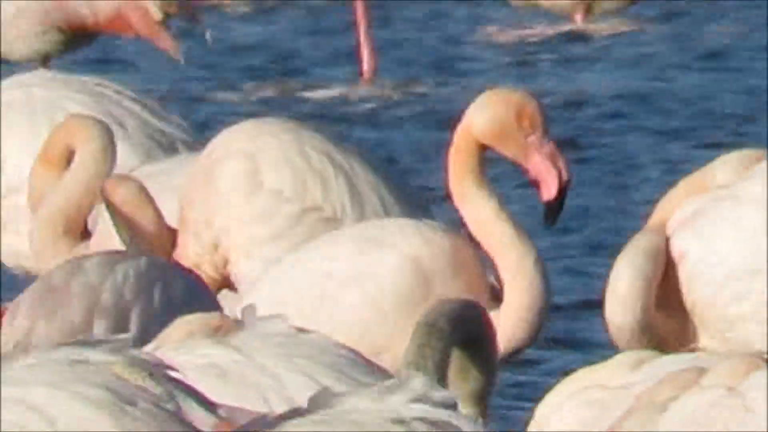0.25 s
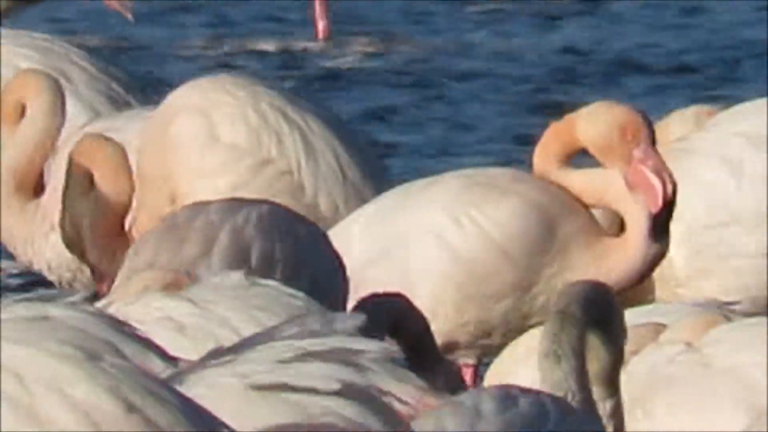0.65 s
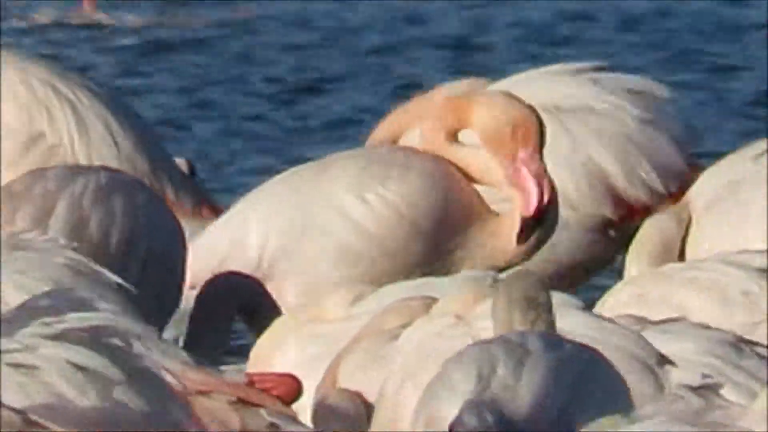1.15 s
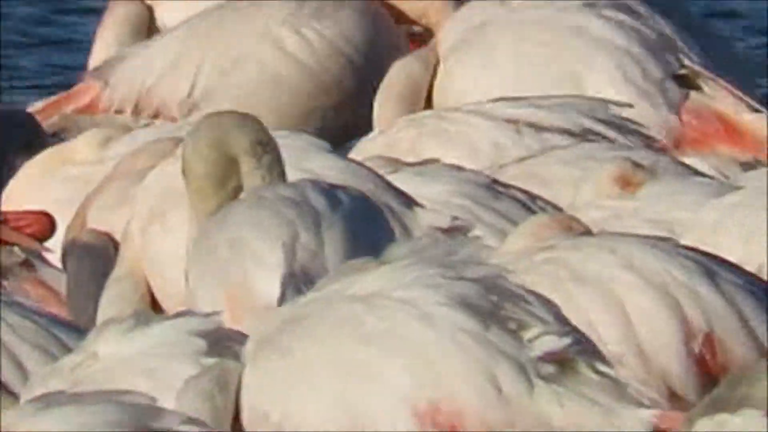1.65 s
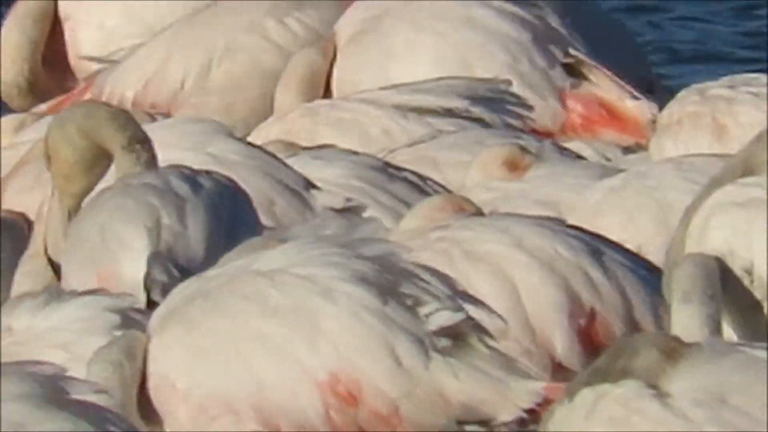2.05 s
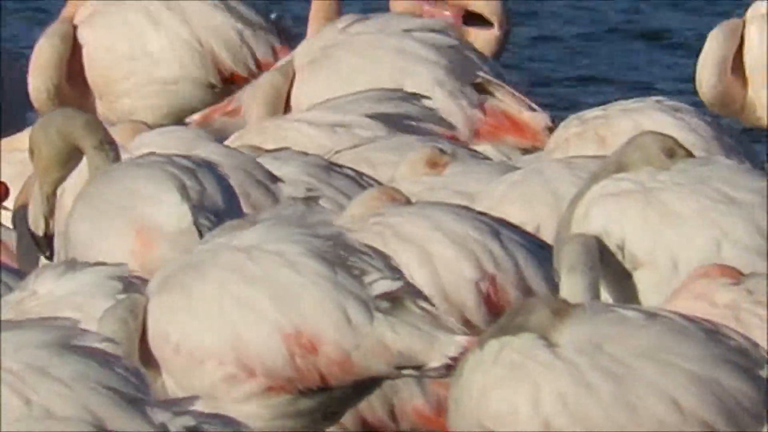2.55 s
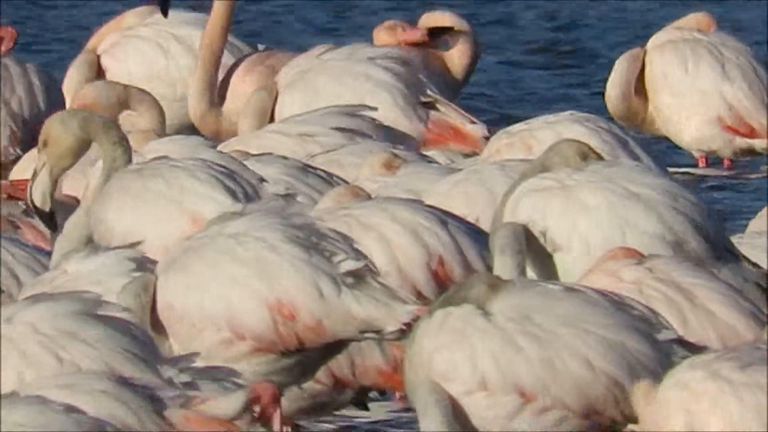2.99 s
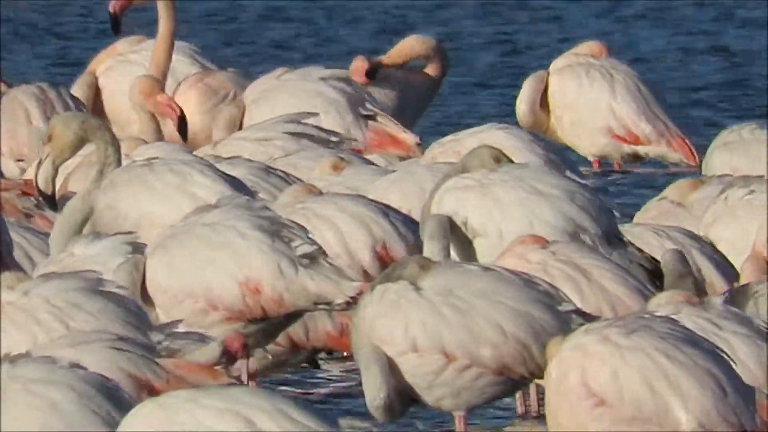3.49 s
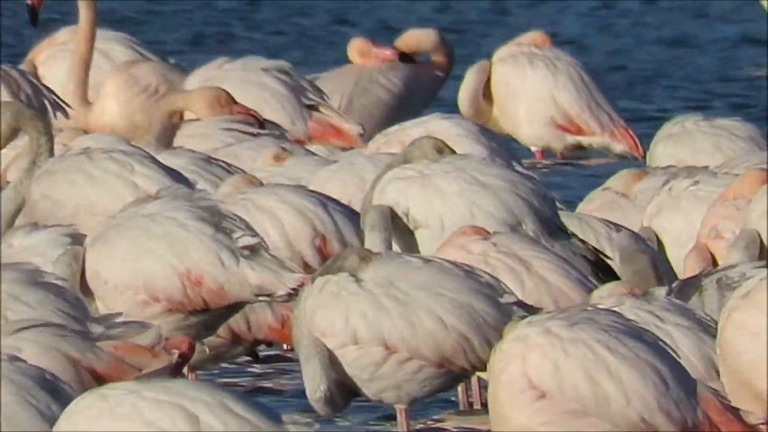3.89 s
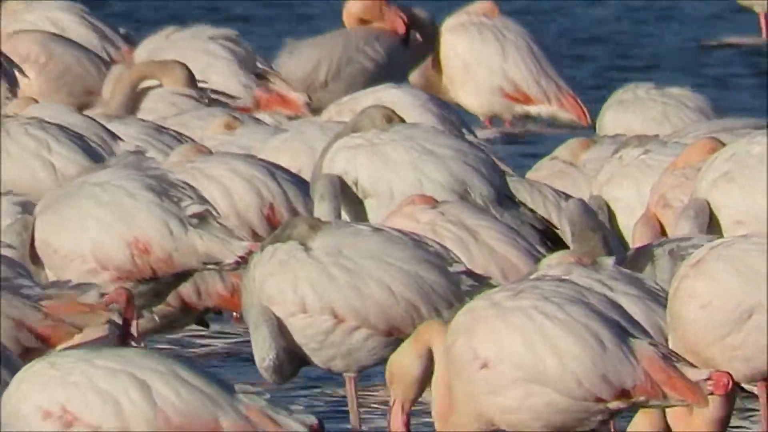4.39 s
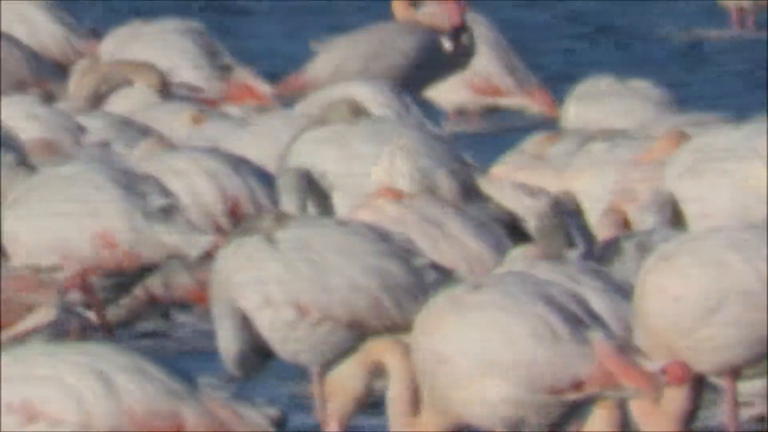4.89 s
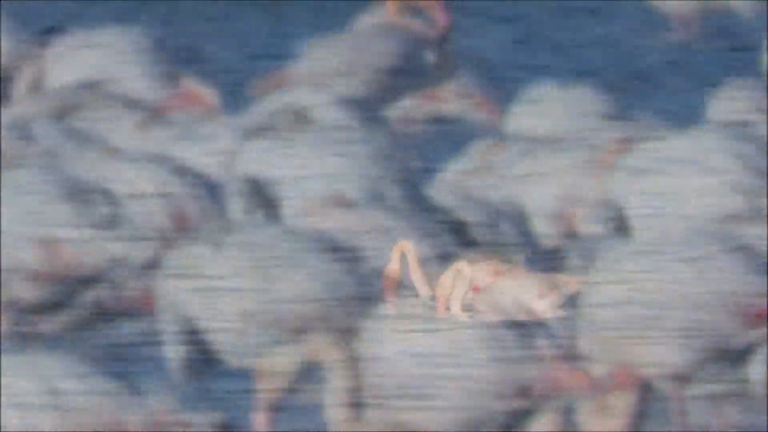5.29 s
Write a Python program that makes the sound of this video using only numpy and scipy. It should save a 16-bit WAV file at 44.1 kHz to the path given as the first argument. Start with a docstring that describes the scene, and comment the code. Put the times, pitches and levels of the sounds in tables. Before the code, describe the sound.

Wind on an open lake shore buffets a camera's two close microphone ports throughout; the resting flamingos in view have no distinct calls. Low rumble and thumps start at once, with slaps around 0.25 and 0.7 seconds, then a brighter roar near 0.8. Gusts keep pressing from 1.1 to 2.3, with ragged, evenly paced crackle in the hardest ones. It eases around 2.4 to 2.9, bursts hard at 3.1, dips, and builds again from 3.8 to 4.4 with heavy slaps and crackle. Beneath are a thin hiss of rippled water and a wavering far murmur. Faint ringing ticks come at 3.4 and 5.1. The wind drops after 4.5; at 4.7 a small click lets the nearly mono bass open into deep, wide rumble for a quarter second. It narrows again, and thumping gusts return from 5.2 to the end.

```python
"""From the start, gusty wind on a lake shore buffets a camera's two microphone ports: low rumble, roar, thumps and slaps.
Faster air makes a brighter roar; the recorder crackles on an even beat, mostly in hard gusts, in ragged runs of tiny steps.
Under it lie a filtered-noise hiss of rippled water and a far murmur; light ticks ring faintly at 3.4 s and 5.1 s.
The camera's wind filter keeps the bass almost mono, but at 4.7 s it lets go with a click:
the rumble opens wide for a quarter of a second, then narrows again for the last gusts."""
import sys
import numpy as np
from scipy import signal
from scipy.fft import rfft, irfft, next_fast_len
from scipy.io import wavfile
from scipy.ndimage import uniform_filter1d, map_coordinates

SR = 44100
rng = np.random.default_rng(int(sys.argv[2]) if len(sys.argv) > 2 else 0)


def int16_out(signal):
    """Quantize to a 16-bit WAV file."""
    q = np.round(np.clip(np.atleast_2d(signal).T, -1, 1) * 32767)
    wavfile.write(sys.argv[1], SR, q.astype(np.int16))


N = 244314  # length in samples, about 5.5 s


def amp(db):
    """Turn decibels into a gain."""
    return 10 ** (np.asarray(db) / 20)


def unit(x):
    """Scale x to an average strength (rms) of 1."""
    return x / np.sqrt(np.mean(x ** 2) + 1e-20)


def clock():
    """Give the time of every sample in seconds."""
    return np.arange(N) / SR


def wobble(rate):
    """Draw a smooth random curve through `rate` random points a second."""
    points = rng.standard_normal(int(N * rate / SR) + 4)
    return map_coordinates(points, [np.arange(N) * rate / SR])


def filtered(x, response):
    """Multiply the spectrum of x by a gain that depends on frequency."""
    size = next_fast_len(N + SR // 4)
    spectrum = rfft(x, size) * response(np.fft.rfftfreq(size, 1 / SR))
    return irfft(spectrum, size)[..., :N]


def coloured(x, points):
    """Filter x by (f/Hz, level/dB) points joined along a logarithmic frequency axis."""
    f, db = np.transpose(points)
    return filtered(x, lambda hz: amp(np.interp(np.log(hz + 1), np.log(f), db)))


def noise(points):
    """Make coloured noise of rms 1, independent at the two ports."""
    return unit(coloured(rng.standard_normal((2, N)), points))


def evened(x, span):
    """Divide out the chance swells of x that are slower than `span` seconds."""
    power = uniform_filter1d(x ** 2, max(int(span * SR), 2), axis=-1)
    return x / np.sqrt(np.abs(power) + 1e-9)


def patchy(x, window, time_span, depth_db):
    """Give the spectrum of x over time, with random patches raised and lowered by `depth_db` rms."""
    z = signal.stft(x, SR, nperseg=window)[2]
    patches = rng.standard_normal(z.shape[1:])
    patches = uniform_filter1d(patches, size=3, axis=0)
    patches = unit(uniform_filter1d(patches, size=time_span, axis=1))
    return z * amp(depth_db * patches)


def wind():
    """Gusts flutter as they pass; each flutter makes the roar both louder and brighter."""
    rumble, blow = airflow(rumble_trim_db=0.16, blow_trim_db=-0.59)
    flutter = wobble(110)
    rumble = rumble * amp(1.3 * flutter)
    blow = blow * amp(1.2 * flutter + 1.2 * wobble(280))
    low = large_eddies(rumble, blow, fast_db=-30.0)
    fine = fine_eddies(blow, knee_hz=1500, knee_growth=0.39, full_db=-13.0, steepness=4.83, patchy_db=2.0)
    hits = buffets(thump_trim_db=-0.5, slap_trim_db=-1.86)
    return low + fine + hits, blow


def airflow(rumble_trim_db, blow_trim_db):
    """The strongest gust of the moment sets the pressure, over a breeze; both drop away in the lulls."""
    # gusts, with levels before the trims and the flutter:
    # crest t/s, swell before it t/s, ebb after it t/s, blow level/dB, rumble level/dB
    gusts = [(0.165, 0.099, 0.063, -36, -22.5), (0.266, 0.064, 0.032, -25, -17),
             (0.515, 0.08, 0.033, -28, -20), (0.701, 0.1, 0.033, -22.5, -17),
             (0.776, 0.017, 0.017, -16.5, -24.5), (0.831, 0.067, 0.11, -16, -21.5),
             (0.98, 0.033, 0.044, -25.5, -23), (1.139, 0.042, 0.047, -26, -20.5),
             (1.39, 0.22, 0.25, -20.5, -22), (1.819, 0.16, 0.16, -18, -20.5),
             (2.061, 0.033, 0.05, -35, -23), (2.195, 0.081, 0.1, -19, -21),
             (2.512, 0.12, 0.067, -31.5, -23.5), (2.7, 0.047, 0.12, -38.5, -26),
             (3.03, 0.05, 0.03, -40, -18.5), (3.097, 0.045, 0.038, -17, -16),
             (3.216, 0.11, 0.087, -23.5, -24), (3.566, 0.095, 0.078, -24.5, -22.5),
             (3.884, 0.088, 0.027, -19.5, -19.5), (4.02, 0.22, 0.16, -18, -23.5),
             (4.12, 0.05, 0.06, -20.5, -23.5), (4.265, 0.22, 0.11, -17, -22.5),
             (4.375, 0.034, 0.023, -25.5, -28), (4.514, 0.057, 0.18, -40, -32),
             (4.845, 0.07, 0.13, -36.5, -29.5), (5.212, 0.01, 0.031, -30.5, -22),
             (5.43, 0.16, 0.17, -31, -16.5)]
    # moments when the air almost stops: middle t/s, half length t/s, depth/dB
    lulls = [(0.358, .02, 6.5), (1.043, 0.017, 2), (1.63, 0.022, 0.5), (2.401, .008, 5.5),
             (2.908, 0.03, 8.5), (3.392, 0.022, 4), (3.695, 0.017, 2.5), (3.766, 0.0059, 10.5),
             (4.982, 0.014, 6.5), (5.114, 0.037, 4)]
    breeze_rumble_db, breeze_blow_db = -32.5, -46
    rumble, blow = np.zeros(N), np.zeros(N)
    for crest, swell, ebb, blow_db, rumble_db in gusts:
        # the large eddies arrive a little earlier, hold steadier and linger
        low = gust_shape(crest, swell, ebb, droop_db=1.24, attack=211, release=235)
        fast = gust_shape(crest, swell, ebb, droop_db=8, attack=338.5, release=401)
        rumble = np.maximum(rumble, amp(rumble_db + rumble_trim_db) * low)
        blow = np.maximum(blow, amp(blow_db + blow_trim_db) * fast)
    drop_db = np.zeros(N)
    for middle, half, depth_db in lulls:
        drop_db += depth_db * np.exp(-np.minimum(((clock() - middle) / half) ** 2, 50))
    calm = amp(-drop_db)
    return calm * np.hypot(rumble, amp(breeze_rumble_db)), calm * np.hypot(blow, amp(breeze_blow_db))


def gust_shape(crest, swell, ebb, droop_db, attack, release):
    """A gust droops in an arch from its crest to its edges, then falls steeply (attack, release in dB per s)."""
    age = clock() - crest
    arch = np.clip(np.where(age < 0, -age / swell, age / ebb), 0, 1) ** 1.65
    flanks = attack * np.maximum(-age - swell, 0) + release * np.maximum(age - ebb, 0)
    return amp(-np.minimum(droop_db * arch + flanks, 120))


def large_eddies(pressure, blow, fast_db):
    """Big swirls rumble; faster air fades their low colour over into a higher one."""
    # colour of the rumble in slow air: f/Hz, relative level/dB per Hz
    slow_air = [(20, -49), (43, -36.5), (86, -13), (130, -4.5), (190, 1), (300, 1), (460, -3), (550, -25),
                (750, -42), (1500, -96)]
    # colour of the rumble in fast air: f/Hz, relative level/dB per Hz
    fast_air = [(20, -50), (43, -39), (86, -31), (130, -21.5), (190, 0), (300, 3), (460, 8), (550, -5),
                (750, -14.5), (1500, -80.5)]
    fast = blow ** 2 / (blow ** 2 + amp(fast_db) ** 2)
    roll = np.sqrt(1 - fast) * noise(slow_air) + np.sqrt(fast) * noise(fast_air)
    return pressure * evened(roll, span=0.055)


def fine_eddies(blow, knee_hz, knee_growth, full_db, steepness, patchy_db):
    """Small swirls roar; their treble falls off above a knee that climbs with the strength of the blow."""
    # how the ports pass the small swirls: f/Hz, relative level/dB
    port = [(150, -56.5), (380, -19), (520, -4.5), (650, 0.6), (820, -0.5), (1000, -0.55), (1400, -0.6),
            (2000, -1.5), (2400, -2.5), (3000, -4.5), (4200, -5), (6000, -15.5)]
    # brightness of the roar over time: t/s, factor on the knee
    brightness = [(0.1, 1.53), (0.28, 1.16), (0.65, 1.04), (0.82, 1.03), (1.1, 1.1), (1.45, 1.17),
                  (1.65, 1.05), (1.82, 1.2), (2.02, 1.05), (2.22, 1.29), (2.5, 1), (2.85, 1.75),
                  (3.1, 0.85), (3.6, 1.01), (3.88, 0.94), (4.05, 1.17), (4.28, 1.13), (4.8, 0.98),
                  (5.2, 1.24), (5.4, 2.05)]
    window = 256
    z = patchy(noise(port), window, time_span=7, depth_db=patchy_db)
    hz = np.fft.rfftfreq(window, 1 / SR)
    t = np.arange(z.shape[-1]) * (window // 2) / SR
    strength = np.interp(t, clock(), blow)
    # in the hardest blows the knee levels off
    knee = knee_hz * (strength / np.hypot(strength, amp(full_db))) ** knee_growth
    knee = knee * np.interp(t, *np.transpose(brightness))
    roll_off = (1 + (hz[:, None] / knee) ** 2) ** (-steepness / 2)
    # a moving knee changes the colour, not the overall strength
    roll_off = roll_off / np.sqrt(np.mean(roll_off[hz > 500] ** 2, axis=0))
    roar = signal.istft(z * roll_off, SR, nperseg=window)[1][:, :N]
    return blow * evened(roar, span=0.047)


def buffets(thump_trim_db, slap_trim_db):
    """Each hard eddy hits the ports with a low thump and a slap of its own pitch; harder slaps reach higher."""
    # hardest single eddies, with levels before the trims: t/s, thump level/dB, slap level/dB, slap f/Hz
    hard_eddies = [(0.124, -18, -27.5, 720), (0.153, -15, -34, 855), (0.222, -21, -17.5, 636),
                   (0.239, -10, -16.5, 675), (0.261, -11.5, -21, 700), (0.271, -17.5, -14.5, 740),
                   (0.33, -14.5, -28, 730), (0.456, -19.5, -16, 950), (0.525, -22.5, -26.5, 710),
                   (0.606, -8, -25.5, 740), (0.615, -15.5, -18.5, 630), (0.676, -21, -18, 850),
                   (0.694, -8.5, -17.5, 784), (0.757, -22.5, -23, 900), (0.775, -23.5, -20.5, 1290),
                   (0.808, -32.5, -19, 1210), (0.832, -25, -22.5, 1230), (0.843, -20, -16, 1060),
                   (0.856, -17.5, -17, 980), (0.883, -26.5, -27, 900), (0.915, -22, -20, 960),
                   (0.947, -19, -21.5, 855), (1.134, -11, -13, 660), (1.16, -15.5, -22, 740),
                   (1.17, -18, -31, 875), (1.232, -21, -24, 1030), (1.262, -30.5, -16, 826),
                   (1.325, -20.5, -25, 764), (1.351, -25, -25.5, 1190), (1.373, -25, -12, 1060),
                   (1.385, -13, -33, 1130), (1.415, -21.5, -16.5, 815), (1.447, -29, -15.5, 876),
                   (1.458, -28.5, -26, 1820), (1.524, -12, -30.5, 846), (1.583, -16.5, -25.5, 1110),
                   (1.686, -12.5, -20.5, 950), (1.712, -18, -18, 648), (1.79, -19, -20.5, 1150),
                   (1.87, -30, -19.5, 1210), (1.896, -12, -21, 870), (1.931, -14, -20, 773),
                   (1.95, -17.5, -24.5, 1040), (2.147, -13.5, -16.5, 920), (2.172, -21, -18.5, 1200),
                   (2.236, -33, -20, 1170), (2.289, -19, -29, 975), (2.415, -14, -28, 750),
                   (2.478, -21, -41.5, 980), (2.521, -21.5, -28, 850), (2.666, -18, -32, 700),
                   (2.722, -18, -41, 694), (3.02, -14, -43, 600), (3.057, -12.5, -28, 600),
                   (3.068, -9.5, -27, 600), (3.08, -14.5, -14, 587), (3.103, -18, -19.5, 950),
                   (3.154, -23.5, -22, 850), (3.191, -31.5, -24, 1260), (3.219, -21.5, -26.5, 800),
                   (3.231, -24, -27.5, 1150), (3.287, -15.5, -21.5, 760), (3.795, -11, -36, 1180),
                   (3.87, -22, -24, 1220), (3.881, -18.5, -10, 760), (3.893, -14, -9.5, 696),
                   (3.949, -15, -17.5, 895), (3.977, -23.5, -22.5, 1450), (4.019, -13.5, -16.5, 960),
                   (4.063, -18, -15.5, 1020), (4.092, -22.5, -21, 1000), (4.181, -20, -16, 934),
                   (4.224, -35, -20, 1230), (4.277, -15.5, -15, 1300), (4.301, -12.5, -19.5, 1050),
                   (4.354, -20.5, -22, 880), (4.466, -27, -40, 800), (4.607, -25.5, -41, 700),
                   (4.639, -20.5, -34, 780), (4.835, -22, -37, 750), (5.202, -12.5, -17.5, 623),
                   (5.272, -26, -40, 1205), (5.294, -14, -29.5, 810), (5.352, -12.5, -48.5, 1140),
                   (5.385, -9.5, -22, 605), (5.398, -18.5, -18.5, 810), (5.423, -11, -15.5, 720),
                   (5.464, -10, -42.5, 970), (5.491, -24, -32.5, 790)]
    thump_hz, full_top_hz, top_growth = 369, 4730, 0.18  # full_top_hz is the reach of a slap at 0 dB
    out = np.zeros((2, N + SR))
    for t, thump_db, slap_db, slap_hz in hard_eddies:
        top_hz = full_top_hz * amp(slap_db) ** top_growth
        thump = eddy(thump_hz, top_hz, rise=0.0026, fall=0.0052, sharpness=0.59, steepness=9.1)
        slap = eddy(slap_hz, top_hz, rise=0.0034, fall=0.0033, sharpness=1.0, steepness=3.77)
        hit = amp(thump_db + thump_trim_db) * thump + amp(slap_db + slap_trim_db) * slap
        start = max(round(t * SR) - hit.shape[1] // 2, 0)
        out[:, start:start + hit.shape[1]] += hit
    return out[:, :N]


def eddy(hz, top_hz, rise, fall, sharpness, steepness, size=2048):
    """A short burst of turbulence around one pitch (rise and fall in s), partly different at the two ports."""
    f = np.fft.rfftfreq(size, 1 / SR) + 1
    age = (np.arange(size) - size // 2) / SR
    band = (1 + (sharpness * (f / hz - hz / f)) ** 2) ** (-steepness / 2)
    band = band / np.sqrt(1 + (f / top_hz) ** 8)
    shape = np.exp(-np.minimum(np.where(age < 0, age / rise, age / fall) ** 2, 50))
    burst = irfft(rfft(shape * rng.standard_normal((2, size))) * band, size)
    # each burst gets the energy of 5 ms at rms 1
    burst = burst / np.linalg.norm(burst, axis=1, keepdims=True) * np.sqrt(0.005 * SR)
    common, apart = burst
    return np.array([common + apart, common - apart]) / np.sqrt(2)


def crackle(loudness, base_db, corner_hz):
    """The recorder adds tiny steps on an even beat: faint ones follow the loudness, strong ones come in runs."""
    # runs of crackle, mostly in hard gusts: from t/s, to t/s, typical step level/dB
    runs = [(.21, .27, -41), (.6, .7, -38), (.83, .94, -37), (.965, 1.005, -41), (1.26, 1.4, -37),
            (1.665, 1.76, -34), (1.82, 1.87, -35), (2.085, 2.225, -38), (3.045, 3.11, -37),
            (3.175, 3.245, -34), (3.56, 3.62, -39), (3.825, 3.87, -35), (3.94, 4.305, -35),
            (5.445, 5.475, -38)]
    # the sharpest single steps: t/s, step level/dB
    snaps = [(.223, -32), (.479, -35), (.661, -33), (.671, -32), (.693, -28), (.842, -32), (1.215, -33),
             (1.322, -33), (1.674, -28), (1.695, -32), (1.706, -30), (1.866, -30), (2.111, -32),
             (2.175, -33), (2.218, -30), (3.05, -28), (3.061, -33), (3.103, -30), (3.178, -33),
             (3.199, -32), (3.221, -32), (3.242, -32), (3.85, -29), (3.861, -31), (3.957, -30),
             (4.117, -33), (4.277, -33), (4.351, -35), (4.373, -34), (5.365, -33), (5.45, -30),
             (5.471, -34)]
    beat_rate, lead = 93.75, 0.0007  # beats per s; how early each step comes, in s
    beats = np.arange(1, int(N / SR * beat_rate)) / beat_rate - lead
    at = np.round(beats * SR).astype(int)
    size = amp(base_db) * loudness[at]
    for start, end, db in runs:
        size = np.where((beats > start) & (beats < end), amp(db), size)
    size = size * np.minimum(rng.exponential(size=len(at)) ** 0.75, 1.5)
    for t, db in snaps:
        size[np.argmin(np.abs(beats - t))] = amp(db)
    steps = np.zeros((2, N))
    steps[:, at] = size * rng.choice([-1, 1], (2, len(at)))
    # each step dies away fast
    return signal.lfilter([1], [1, -np.exp(-2 * np.pi * corner_hz / SR)], steps)


def hiss(blow, level_db, gust_db, sink_db, recovery_s):
    """An even hiss flares with the blow; the recorder's gain sinks it after hard gusts, then lets it creep back."""
    # colour of the hiss of water and air: f/Hz, relative level/dB per Hz
    water_and_air = [(200, -18.5), (900, 14), (2000, 0), (3000, -0.5), (4500, -6.5), (7000, -11),
                     (9000, -10.5), (11500, -10), (15500, -20)]
    keep = np.exp(-1 / (recovery_s * SR))
    recent = signal.lfilter([1 - keep], [1, -keep], blow ** 2)
    flare = 1 + (blow * amp(gust_db)) ** 2
    sink = 1 + recent * amp(sink_db) ** 2
    return amp(level_db) * np.sqrt(flare / sink) * noise(water_and_air)


def murmur(trim_db, patchy_db, waver_db):
    """A far wash of midrange noise over the lake wavers and shifts its colour in short patches."""
    # colour of the murmur: f/Hz, relative level/dB per Hz
    midrange = [(300, -24), (600, 1), (850, 3.5), (1200, -7.5), (1700, -14.5), (2300, -20), (3000, -35),
                (5000, -69.5)]
    # loudness of the murmur before the trim and the waver: t/s, level/dB
    course = [(0, -43.5), (.37, -49.5), (1.05, -43), (2.03, -43), (2.501, -46), (2.88, -54.5), (3.0, -41),
              (3.36, -56.5), (3.72, -62), (4.5, -49.5), (4.65, -48), (4.97, -59.5), (5.2, -46.5)]
    z = patchy(noise(midrange), window=512, time_span=9, depth_db=patchy_db)
    wash = unit(signal.istft(z, SR, nperseg=512)[1][:, :N])
    level_db = np.interp(clock(), *np.transpose(course)) + trim_db
    return amp(level_db + waver_db * wobble(35)) * wash


def ticks():
    """Two small contacts ring briefly; randomly shaken phases make their tones scrape."""
    # faint light ticks nearby: t/s, level/dB
    contacts = [(3.388, -46), (5.133, -41)]
    # tones each tick rings with: f/Hz, level relative to the tick/dB, time to fade by 60 dB t/s
    tones = [(1800, -3.5, 0.034), (2230, -8, .03), (2740, -12, 0.066), (4500, -13, .025),
             (4960, -15, 0.018)]
    out = np.zeros(N)
    for t, db in contacts:
        age = np.maximum(clock() - t, 0)
        onset = 1 - np.exp(-age / 0.0015)
        for hz, tone_db, t60 in tones:
            phase = 2 * np.pi * hz * age + 1.5 * wobble(860)
            out += amp(db + tone_db - 60 * age / t60) * np.sin(phase) * onset
    return out


def scene():
    """Add the wind at both ports, the hiss of the shore, the far murmur and the ticks."""
    roar, blow = wind()
    shore = hiss(blow, level_db=-56.5, gust_db=28.0, sink_db=30.5, recovery_s=0.26)
    far = murmur(trim_db=-1.65, patchy_db=5, waver_db=1.5)
    return roar + shore + far + ticks()


def wind_filter(mid, side):
    """Thin out the bass of the left-right difference, except while the filter lets go with a click."""
    # left-right difference with the filter on: f/Hz, gain/dB
    narrow = [(40, -38), (130, -49), (200, -44.5), (300, -25), (500, -20.5), (1000, -12), (2000, -5),
              (4000, 2.5), (12000, 5)]
    # what joins the difference while the filter lets go: f/Hz, gain/dB
    wide = [(20, 11), (100, 27.5), (250, 9.5), (450, 12.5), (800, 5), (1100, 4.5), (1800, -3), (4000, -50)]
    # deep bass that comes back to the sum meanwhile: f/Hz, gain/dB
    deep = [(20, 13), (45, 22), (90, 7), (160, -6), (400, -52)]
    start, end, fade, click_db = 4.724, 4.990, 0.002, -31  # s, s, s, dB
    let_go = np.interp(clock(), [start, start + fade, end - fade, end], [0, 1, 1, 0])
    mid = mid + let_go * coloured(mid, deep)
    mid[round(start * SR)] += amp(click_db)
    side = coloured(side, narrow) + let_go * coloured(side, wide)
    return mid, side


def record(dry):
    """Sum and difference crackle and pass the wind filter; peaks are rounded and the treble is cut."""
    # treble response of the camera: f/Hz, gain/dB
    treble = [(6000, 1), (11500, -10), (13000, -17), (15400, -25.5)]
    top_hz, ceiling = 15400, 0.82
    both = np.array([dry[0] + dry[1], dry[0] - dry[1]]) / np.sqrt(2)
    loudness = np.sqrt(np.abs(uniform_filter1d(both[0] ** 2, SR // 20)))
    mid, side = both + crackle(loudness, base_db=-27, corner_hz=700)
    mid, side = wind_filter(mid, side)
    pair = np.array([mid + side, mid - side])
    rounded = pair / (1 + (pair / ceiling) ** 6) ** (1 / 6)
    return filtered(coloured(rounded, treble), lambda hz: hz < top_hz)


dry = scene()
out = record(dry)
int16_out(out)
```